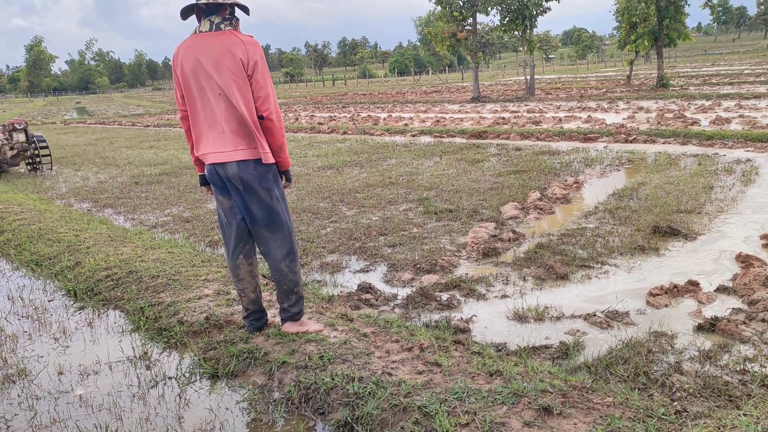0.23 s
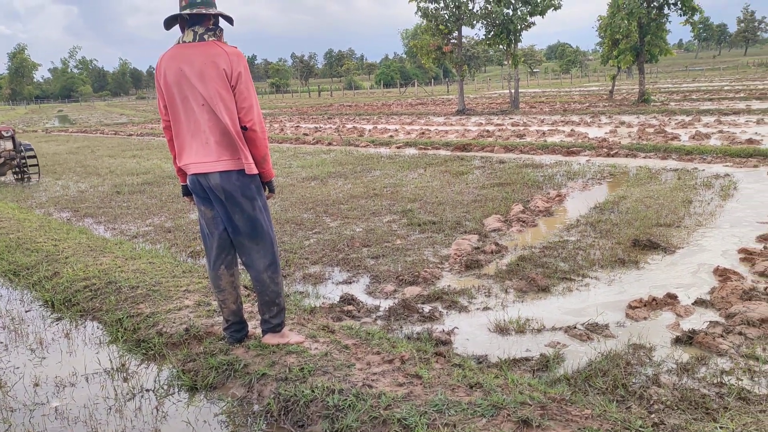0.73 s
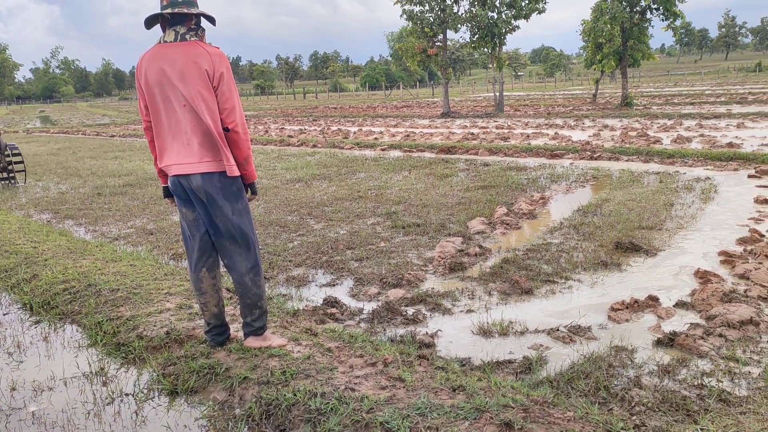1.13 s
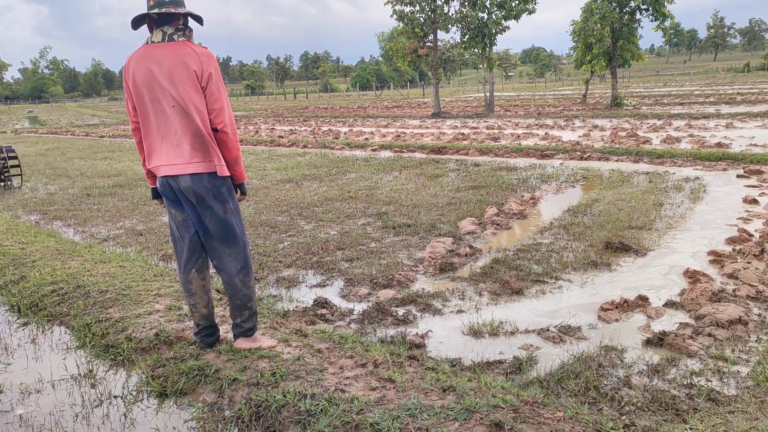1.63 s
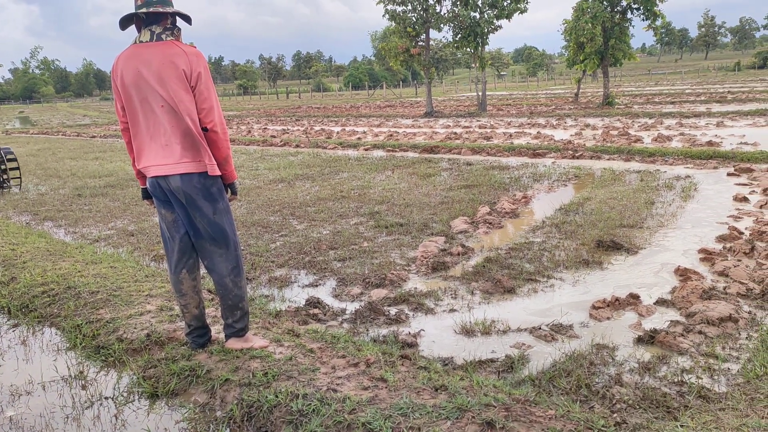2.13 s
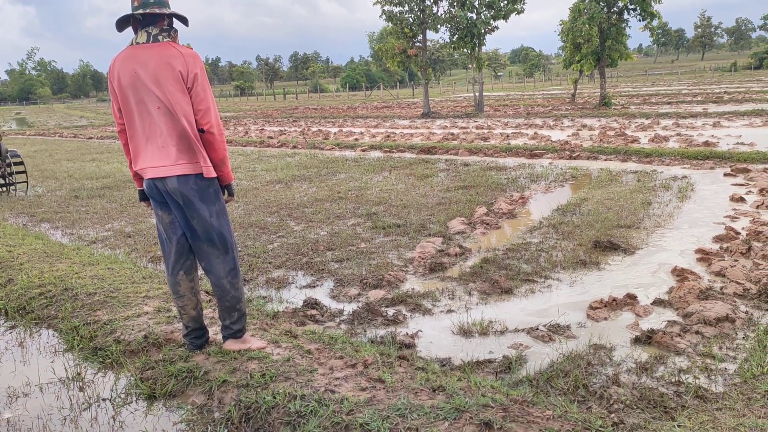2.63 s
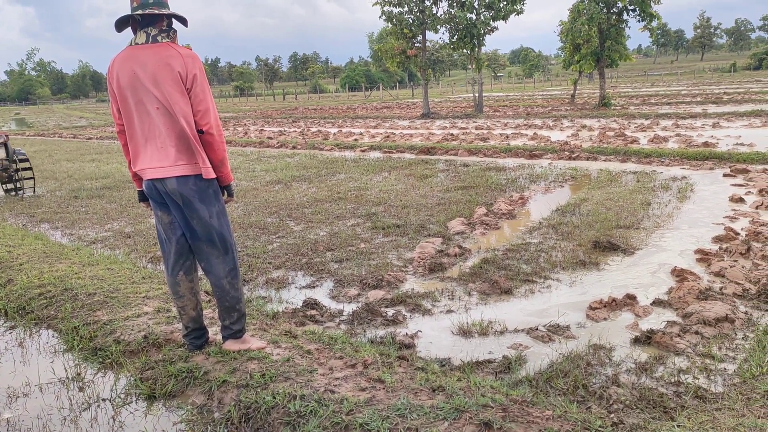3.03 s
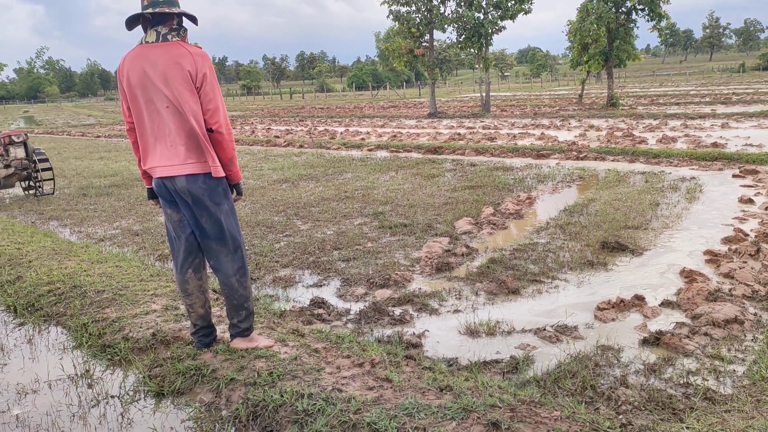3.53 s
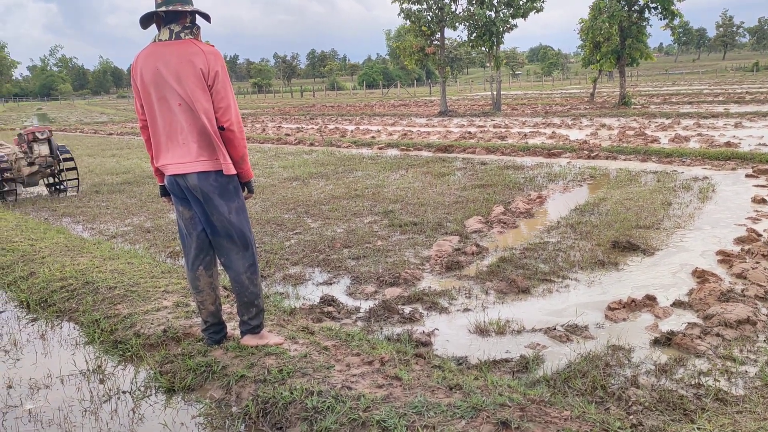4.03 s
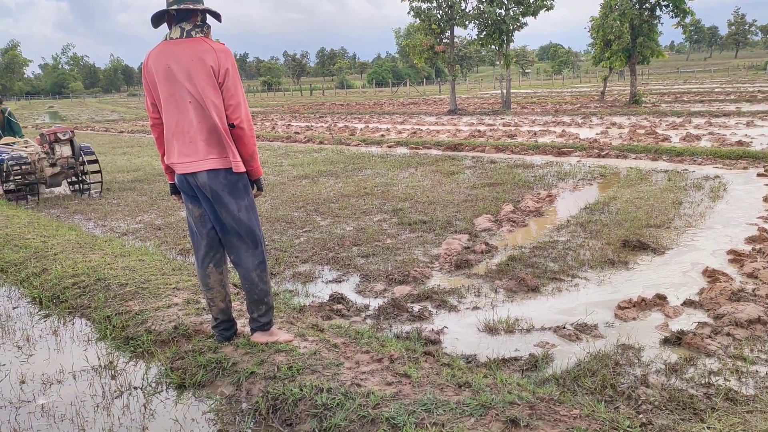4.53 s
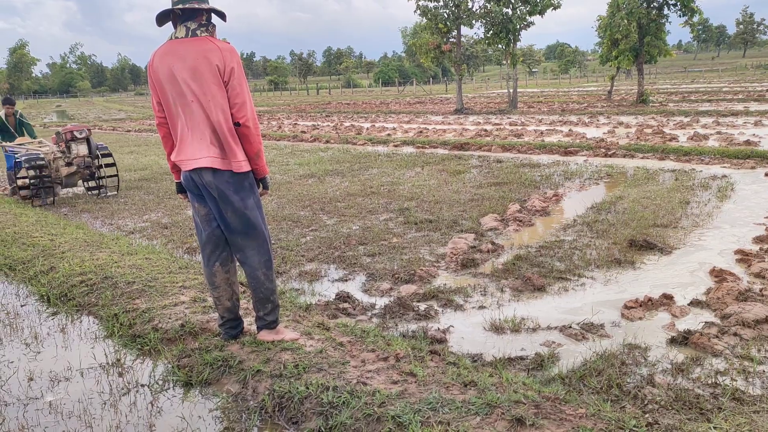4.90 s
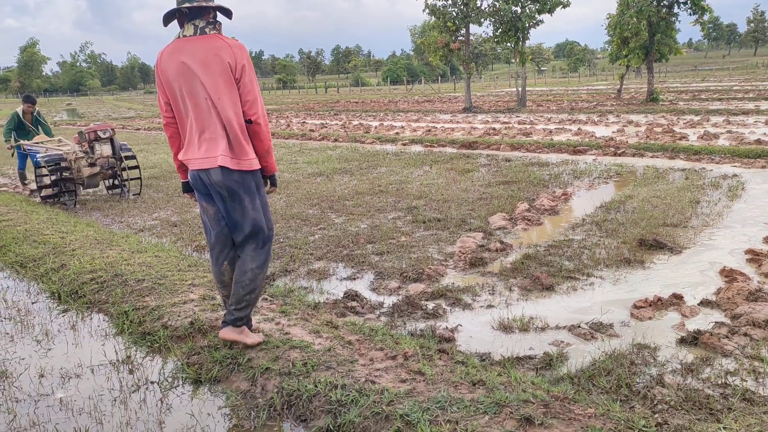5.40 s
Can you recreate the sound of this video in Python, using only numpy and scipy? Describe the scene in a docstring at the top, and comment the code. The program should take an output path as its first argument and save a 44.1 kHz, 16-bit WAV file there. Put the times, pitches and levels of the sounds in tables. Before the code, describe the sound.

A walk-behind tractor's single-cylinder diesel chugs steadily in a flooded field, about ten hard knocks a second, slightly to the left. Water sprays off its wheels and loose steel chinks along with the engine. Gusts of wind thump and rumble on the left side of the microphone, growing stronger and nearly constant toward the end, when they briefly push the engine down in level.

```python
"""The hard chugging of a one-cylinder diesel, about ten beats a second, comes from the left of a phone.
It is a walk-behind tractor churning through a flooded field. Each engine cycle brings a knock as the
fuel burns, a piston slap, an exhaust puff, valve hiss and an intake thump. The cage wheels splash and
loose steel chinks along. Gusts buffet and crack at the left microphone opening (port), and the phone's
gain control turns everything down under the strong ones."""
import sys
import numpy as np
from scipy import signal
from scipy.fft import rfft, irfft
from scipy.io import wavfile
from scipy.ndimage import uniform_filter1d, minimum_filter1d, map_coordinates

SR = 44100
rng = np.random.default_rng(int(sys.argv[2]) if len(sys.argv) > 2 else 0)


def master_out(mix):
    """Clip the mix to full scale and print it as 16-bit PCM to the path in sys.argv[1]."""
    frames = np.transpose(np.atleast_2d(mix))
    ceiling = np.clip(frames, -1, 1)
    pcm = np.round(ceiling * 32767).astype(np.int16)
    wavfile.write(sys.argv[1], SR, pcm)


N = 249606
TIME = np.arange(N) / SR

# How fast the engine fires: t/s, f/Hz
FIRING_RATE = [(0, 9.958), (.5, 9.774), (1, 9.712), (1.6, 9.625), (2.2, 9.78), (3, 9.872), (3.8, 10.008),
               (4.5, 10.128), (5.1, 10.197), (5.66, 10.024)]

def tractor():
    """The whole machine in stereo; one count of engine cycles keeps all its parts in step."""
    cycles = .066 + np.cumsum(curve(FIRING_RATE)) / SR  # it fires at each whole number
    gas = puffs(cycles) + churn(cycles)
    force_db = combustion(cycles)

    def metal_and_water():
        engine = knock(cycles, force_db) + slap(cycles, force_db) + clatter(cycles)
        return engine + splash(cycles) + rattle(cycles)

    return at_ports(gas, direct=metal_and_water(), scattered=metal_and_water())


# How hard the engine works: t/s, level/dB
ENGINE_LOAD = [(0, 3.5), (.6, 0.5), (1.35, 3), (1.75, 3), (2.25, 1), (2.9, 3.5), (3.6, 3), (4.45, 1),
               (4.7, 1), (5.35, 2), (5.66, 6.5)]
# Firings that stand out as hard or soft: t/s, added level/dB
STANDOUT_FIRINGS = [(.3, 3), (.81, 2), (1.12, 0.5), (1.43, -1.5), (1.74, 3), (2.15, 0.5), (2.35, 2.5),
                    (2.46, -3), (2.56, 1.5), (2.76, -0.5), (3.27, -2), (3.37, 2.5), (3.47, -2.5), (3.57, 2),
                    (3.77, 2.5), (4.37, 3), (4.47, 2)]

def combustion(cycles, chance_db=1):
    """How hard the fuel fires, in dB: it follows the load and differs a little each time."""
    force_db = curve(ENGINE_LOAD) + chance_db * each_cycle(cycles)
    for when, db in STANDOUT_FIRINGS:
        nearest = np.round(np.interp(when, TIME, cycles))
        force_db += db * (np.floor(cycles) == nearest)
    return force_db


# The two bounces after a knock: place/cycles, relative strength
KNOCK_BOUNCES = [(.115, 0.28), (0.239, 0.12)]
# Tone of the knock: f/Hz, relative level/dB
KNOCK_TONE = [(200, -11), (850, -6), (1250, 6), (2600, 0.5), (4500, -4.5), (6500, -4), (15000, -4.5)]
# Ring of a sheet-metal cover, before the firing's force is added: t/s, level/dB
COVER_RING = [(0, -52), (.6, -32), (.85, -17), (1.7, -21), (2.5, -23), (3.5, -29.5), (4.4, -27.5),
              (5.66, -27)]

def knock(cycles, force_db, level_db=-23, cover_hz=2770, cover_sag=.85):
    """Burning fuel hammers the engine block; a cover clanks along, sagging in pitch."""
    age = cycles % 1
    strike = (1 - np.exp(-age / .0015)) * np.exp(-(age / .052) ** 2)  # sudden and soon over
    strike += sum(size * swell(cycles, place, length=0.034) for place, size in KNOCK_BOUNCES)
    tail = 0.14 * stroke(cycles, 0, decay=.5, rise=0.057)
    bang = colour(rng.standard_normal(N) * (strike + tail) * amp(force_db + level_db), KNOCK_TONE)
    sag = cover_sag * np.minimum(age, KNOCK_BOUNCES[0][0])  # stops at the first bounce
    cover = gritty_tone(cover_hz * (1 - sag), grit=.03)
    return block(bang, ring_db=-0.5) + amp(curve(COVER_RING) + force_db) * strike * cover


# Notes at which the block and covers ring: f/Hz, width/Hz, relative level/dB
BLOCK_NOTES = [(1418.4, 19.6, 11), (2005, 61, 1), (2355, 55, 6.5), (2700, 95, 6.5), (3187, 200, 1),
               (3705, 154, 1.5), (5880, 145, 8), (6810, 240, 5.5), (11000, 120, -3), (13370, 130, 9)]

def block(x, ring_db):
    """The engine block adds its own ringing to whatever shakes it."""
    rings = sum(amp(db) * signal.lfilter(*signal.iirpeak(hz, hz / width, SR), x)
                for hz, width, db in BLOCK_NOTES)
    return x + amp(ring_db) * rings


def slap(cycles, force_db, high_hz=3900, low_hz=950, fall_cycles=0.039, level_db=-28):
    """Just past the top of its travel the piston slaps the cylinder: a clack that drops in pitch."""
    hz = low_hz + (high_hz - low_hz) * np.exp(-(cycles % 1) / fall_cycles)
    clack = gritty_tone(hz, grit=.03) * swell(cycles, place=0.057, length=0.035)
    return clack * amp(force_db + level_db)


# Exhaust, a deep thud just after the knock, intake, a short higher pip between exhaust and intake,
# and the intake closing: place/cycles, f/Hz, half length/s, relative pressure (+ or -)
GAS_PULSES = [(.267, 222, 0.0027, -0.077), (0.09, 71, 0.0042, 0.031), (.558, 240, 0.0037, 0.11),
              (0.4, 570, 0.003, 0.028), (0.8, 180, 0.0031, -0.064)]

def puffs(cycles, level_db=3.2, uneven_db=3):
    """Exhaust and intake shove the air in short, low thumps, never quite the same twice."""
    out = np.zeros(N)
    for place, hz, length, pressure in GAS_PULSES:
        age = (cycles % 1 - place + .0015 * each_cycle(cycles)) / curve(FIRING_RATE)
        size = pressure * amp(level_db + uneven_db * each_cycle(cycles))
        out += size * np.sin(2 * np.pi * hz * age) * np.exp(-(age / length) ** 2)
    return out


# Tone of the air swirling in the intake and silencer: f/Hz, relative level/dB
CHURN_TONE = [(30, -3), (130, -2.5), (280, -2.5), (400, -4), (680, -19), (1100, -41), (4000, -85)]

def churn(cycles, level_db=-27):
    """Air churns in the intake and silencer, swelling just before each intake thump; it settles before the next
    exhaust puff."""
    gulp = stroke(cycles, place=0.477, decay=0.14, rise=0.025)
    return colour(rng.standard_normal(N) * gulp, CHURN_TONE) * amp(level_db)


# Tone of the clatter: f/Hz, relative level/dB
CLATTER_TONE = [(30, 12), (130, 10), (280, 13.5), (400, 9), (680, 6.5), (950, -1.5), (1800, 1.5),
                (3000, -5.5), (5000, -16), (15000, -6)]

def clatter(cycles, level_db=-38, load_follow=0.29):
    """Gears, belt and panels shake all through the cycle, more under load and after each firing."""
    shake = amp(level_db + load_follow * curve(ENGINE_LOAD) + 2 * wander(92))
    shake *= 1 + 1.1 * stroke(cycles, 0.045, decay=0.5, rise=0.045)
    return block(colour(shake * rng.standard_normal(N), CLATTER_TONE), ring_db=-1)


# Hisses of the valves: place/cycles, strength relative to the spray, decay/cycles
VALVE_HISSES = [(.22, 1.07, 0.12), (0.45, 2.44, 0.078), (.77, 1.5, 0.035)]
# Water thrown up by the wheels: t/s, level/dB
WHEEL_SPRAY = [(0, -41), (1, -40), (2, -40), (3.3, -41), (4.3, -38), (5.25, -41.5), (5.66, -37)]
# Tone of the splash: f/Hz, relative level/dB
SPLASH_TONE = [(300, -20), (1500, -9), (3000, -5.5), (4500, 0), (5800, -1.5), (7000, -7.5), (11000, -2.5),
               (15000, -10)]

def splash(cycles, drops_per_s=260, drop_size=5):
    """Water sprays off the cage wheels, and the valves tick and hiss through it."""
    valves = sum(size * amp(2 * each_cycle(cycles)) * stroke(cycles, place, decay, rise=0.0088)
                 for place, size, decay in VALVE_HISSES)
    drops = drop_size * rng.standard_normal(N) * (rng.random(N) < drops_per_s / SR)
    hiss = (1 + valves) * rng.standard_normal(N) * amp(3.06 * wander(57))
    spray = slosh(hiss + drops) * amp(curve(WHEEL_SPRAY))
    return block(colour(spray, SPLASH_TONE), ring_db=-3.5)


def slosh(x, depth_db=4):
    """Sheets of water form and break: high and low patches of the sound swell and fade."""
    bands = signal.stft(x, nperseg=1024)[2]
    patches = uniform_filter1d(rng.standard_normal(bands.shape), size=5, axis=0)  # smooth over pitch
    patches = uniform_filter1d(patches, size=6, axis=1)  # and over time
    return signal.istft(bands * amp(depth_db * patches / patches.std()))[1][:N]


# Notes of the loose steel parts: f/Hz, relative level/dB
STEEL_NOTES = [(3750, -3.5), (4400, -0.5), (4750, 2), (5850, 3.5)]
# How much the steel on the frame and wheels rattles: t/s, level/dB
STEEL_RATTLE = [(0, -36.5), (.55, -36), (.8, -47), (3.3, -43.5), (3.8, -29.5), (4.4, -31), (5.66, -35)]

def rattle(cycles, calm_hits_per_s=220, ring_s=0.0025):
    """Loose steel chinks, harder and more often when a firing or the loudest valve jolts the frame."""
    jolt = 1 + 3 * stroke(cycles, 0, decay=0.092, rise=0.013)
    jolt += 1.8 * stroke(cycles, VALVE_HISSES[1][0], decay=0.04, rise=0.0077)
    chance = jolt * calm_hits_per_s / len(STEEL_NOTES) / SR
    out = np.zeros(N)
    for hz, db in STEEL_NOTES:
        hits = (rng.random(N) < chance) * rng.standard_normal(N) * jolt
        fades = signal.lfilter([1], [1, -np.exp(-1 / (ring_s * SR))], hits)
        out += amp(db) * fades * gritty_tone(hz, grit=.035)
    return out * amp(curve(STEEL_RATTLE))


# How the two ports hear the tractor:
# f/Hz, left level/dB, right level/dB, likeness from 0 to 1, extra lag on the right/radians
PORT_HEARING = [(300, -0.5, -1, 0.34, -1), (866, -9.5, -2.5, 0.77, 0), (1297, 0, -7.5, 1, -0.5),
                (2510, 2.5, -5, 0.46, 0), (3200, -2, -1.5, 0.89, -1), (4530, -1, 3.5, 0.7, 0.98),
                (5090, -11, -2, 0.04, 4.5), (5740, -10, -7, 0.28, 5), (7160, -11.5, -22, 0.2, 8.5),
                (7880, -28, -48, .3, 20), (8530, -20, -30.5, .3, -2.5), (13300, -28, -40, 0.4, 14.5)]
# How much sooner the sound reaches the left port: t/s, head start/s
LEFT_HEAD_START = [(0, .00034), (3.5, .000315), (5.66, .00027)]

def at_ports(gas, direct, scattered):
    """The left port hears the tractor first; the right one hears part of it as scattered sound."""
    gas, direct, scattered = rfft(gas), rfft(direct), rfft(scattered)
    hz = np.fft.rfftfreq(N, 1 / SR)
    left_db, right_db, alike, lag = (spectrum(PORT_HEARING, hz, column) for column in (1, 2, 3, 4))
    alike = np.clip(alike, 0, 1)
    blend = alike * direct + np.sqrt(1 - alike ** 2) * scattered
    right = irfft((blend + gas) * amp(right_db) * np.exp(-1j * lag), N)
    left = irfft((direct + gas) * amp(left_db), N)
    left = map_coordinates(left, [np.arange(N) + curve(LEFT_HEAD_START) * SR], order=3)
    return np.array([left, right])


# Tones of the wind's deep rumble and its brighter buffeting: f/Hz, relative level/dB
RUMBLE_TONE = [(10, -28), (25, -0.5), (45, 4), (90, 1), (200, -0.5), (300, -12.5), (450, -34.5), (800, -36),
               (2000, -51.5), (6000, -75)]
BUFFET_TONE = [(40, -21), (150, -0.5), (250, 1), (450, -5), (700, -17.5), (1100, -32.5), (2500, -55),
               (6000, -95.5)]

def wind(brightening=0.49, flutter_db=2.5, shelter_db=-24):
    """Wind flutters at the left port, its rumble brightening as it grows; the right is sheltered."""
    gust_db, buffet_db = gusts()
    buffet = amp(buffet_db + brightening * (gust_db - 2.5))
    flow = eddies(RUMBLE_TONE, lumps_db=9.5) + buffet * eddies(BUFFET_TONE, lumps_db=8.5)
    flow /= np.hypot(1, buffet)  # same power for any blend
    left = amp(gust_db + flutter_db * wander(23.2)) * flow + pops(gust_db)
    right = amp(shelter_db + 0.5 * gust_db + 2 * wander(4.1)) * eddies(RUMBLE_TONE, lumps_db=7)
    return np.array([left, right])


# The breeze under the gusts, stronger near the end: t/s, level/dB
BREEZE_LEVEL = [(0, -27), (1, -26), (1.9, -16), (2.9, -27), (3.6, -17.5), (4.1, -26.5), (4.6, -11),
                (5.66, -6.5)]
# Gusts at the left port: t/s, length/s, level/dB, buffeting over rumble before brightening/dB
WIND_GUSTS = [(0.217, 0.19, -15, 1), (1.071, 0.11, -13.5, 3.5), (1.345, 0.043, -18.5, 8),
              (1.478, 0.12, -7.5, 2), (1.66, 0.087, -20.5, 6), (2.027, 0.14, -8.5, -1.5),
              (2.193, 0.049, -4.5, 4), (2.268, 0.19, -12.5, -0.5), (2.619, 0.17, -15.5, -0.5),
              (2.996, 0.027, -6.5, -12), (3.067, 0.14, -9, 5.5), (3.882, 0.074, -7.5, 3.5),
              (4.151, 0.094, -16.5, 1.5), (4.31, 0.086, -16, -6.5), (4.563, 0.069, 0, 1),
              (4.675, 0.093, -4.5, -7), (4.788, 0.1, -3.5, -2.5), (4.939, 0.099, -2, -9.5),
              (5.107, 0.07, 1, -10.5), (5.235, 0.016, 0.5, -3), (5.418, 0.047, 2, -11.5)]

def gusts(rise_s=0.016, fall_s=0.025, breeze_buffet_db=0.5):
    """Gusts swell, hold and die away over the breeze; gives the wind's level and buffeting in dB."""
    energy = amp(curve(BREEZE_LEVEL)) ** 2
    buffeting = energy * breeze_buffet_db
    for start, length, level_db, buffet_db in WIND_GUSTS:
        age = TIME - start
        fade = np.exp(-np.maximum(age - length, 0) / fall_s)
        gust = amp(level_db) * np.clip(age / rise_s, 0, 1) * fade
        energy += gust ** 2
        buffeting += gust ** 2 * buffet_db
    return 10 * np.log10(energy), buffeting / energy


def eddies(tone, lumps_db):
    """Tumbling air makes lumpy noise, its level evened out over a thirtieth of a second."""
    x = colour(rng.standard_normal(N) * amp(lumps_db * wander(86)), tone)
    return x / np.sqrt(power(x, size=1500))


# Big whirls of air that hit the left port, from round thumps to sharp cracks: t/s, level/dB, f/Hz
BIG_WHIRLS = [(.279, -6, 256), (.334, -2.5, 129), (1.137, -14, 375), (1.153, 1, 197), (1.195, -6, 288),
              (1.504, -9, 201), (1.534, -4, 392), (1.575, 1, 140), (2.147, -4, 365), (2.216, 5, 370),
              (2.239, -1.5, 367), (3.01, -3.5, 190), (3.088, -5, 170), (3.122, -7, 286), (3.136, -3, 149),
              (3.148, -0.5, 270), (3.824, -10.5, 228), (3.932, 1, 327), (4.251, -1.5, 110),
              (4.338, -8.5, 217), (4.509, -6.5, 374), (4.558, -2, 80), (4.579, -1, 470), (4.583, 5, 795),
              (4.595, 5.5, 243), (4.606, 3.5, 780), (4.637, 2, 540), (4.66, -1.5, 480), (4.713, -1.5, 570),
              (4.869, 3, 139), (4.887, -2.5, 497), (4.967, -1, 90), (5.024, -5, 700), (5.063, 6.5, 100),
              (5.166, 3, 580), (5.196, -1.5, 550), (5.244, -0.5, 560), (5.253, 2.5, 620), (5.259, -3, 720),
              (5.265, 3.5, 516), (5.307, 1.5, 465), (5.381, -3, 530), (5.437, 8, 130), (5.455, -3, 600),
              (5.469, 5, 603)]

def pops(gust_db, most_per_s=110, small_db=-16, small_hz=560, crackle_db=-9, crackle_s=0.0074):
    """Gusts throw whirls at the port: many small ones, and big ones that swing twice and crackle."""
    chance = np.minimum(amp(gust_db), 1) * most_per_s / SR
    hits = (rng.random(N) < chance) * rng.standard_normal(N) * amp(gust_db + small_db)
    out = signal.oaconvolve(hits, pop(small_hz), "same")
    t = np.arange(1500) / SR
    for when, db, hz in BIG_WHIRLS:
        crackle = (rng.random(len(t)) < hz / SR) * rng.standard_normal(len(t))
        crackle *= amp(crackle_db) * np.exp(-t / crackle_s)
        swings = (t == 0) + 0.44 * (np.arange(len(t)) == round(SR / hz))
        blow = amp(db) * signal.fftconvolve(crackle + swings, pop(hz))
        start = round(when * SR) - len(pop(hz)) // 2
        out[start:start + len(blow)] += blow
    return out


def pop(hz):
    """One whirl passing the port: a pressure peak between two dips."""
    u = np.pi * hz * np.arange(-600, 601) / SR
    return (1 - 3 * u ** 2) / (1 + u ** 2) ** 3


def stroke(cycles, place, decay, rise):
    """A quick rise and a fade, once a cycle; all times are in cycles."""
    age = (cycles - place) % 1
    return (1 - np.exp(-age / rise)) * np.exp(-age / decay)


def swell(cycles, place, length):
    """A short rounded swell, once a cycle."""
    return np.exp(-((cycles % 1 - place) / length) ** 2)


def each_cycle(cycles):
    """One random number for every cycle."""
    return rng.standard_normal(100)[np.clip(cycles.astype(int), 0, 99)]


def gritty_tone(hz, grit):
    """A rough ring: its pitch trembles fast, by about the fraction grit."""
    return np.sin(2 * np.pi * np.cumsum(hz * (1 + grit * wander(595.6))) / SR)


def wander(rate_hz):
    """A smooth random wobble, about 1 in size."""
    keep_slow = np.exp(-(np.fft.rfftfreq(N, 1 / SR) / rate_hz) ** 2)
    x = irfft(rfft(rng.standard_normal(N)) * keep_slow, N)
    return x / x.std()


def colour(x, tone, size=4096):
    """Give a sound the tone in a table; plain noise keeps its overall level."""
    log_gain = np.log(amp(spectrum(tone, abs(np.fft.fftfreq(size, 1 / SR)))))
    response = np.exp(np.conj(signal.hilbert(log_gain)))  # rings after a hit, never before
    taps = np.fft.ifft(response).real[:size // 2]
    return signal.oaconvolve(x, taps / np.linalg.norm(taps))[:N]


def spectrum(rows, hz, column=1):
    """Join a table's points smoothly from low pitch to high."""
    rows = np.array(rows)
    return np.interp(np.log(hz + 1), np.log(rows[:, 0]), rows[:, column])


def curve(rows):
    """Join a table's points with straight lines over time."""
    return np.interp(TIME, *np.array(rows).T)


def power(x, size):
    """Average power over a sliding window of samples."""
    return abs(uniform_filter1d(x ** 2, size)) + 1e-12


def amp(db):
    """Turn decibels into a multiplier."""
    return 10 ** (np.asarray(db) / 20)


def scene():
    """The tractor, with wind blowing on the phone."""
    return tractor() + wind()


def record(dry, threshold_db=-9, squeeze=0.93, recover_db_per_s=11, top_hz=15750):
    """The phone turns loud moments down fast, recovers slowly, limits peaks and cuts the top treble."""
    level_db = 10 * np.log10(power(dry, size=1300).max(0))
    recovery = recover_db_per_s * TIME
    held_db = np.maximum.accumulate(level_db + recovery) - recovery
    over_db = np.maximum(held_db - threshold_db, 0)
    out = dry * amp(-squeeze * uniform_filter1d(over_db, size=200))
    peak_gain = .91 / np.maximum(abs(out).max(0), .91)
    out *= uniform_filter1d(minimum_filter1d(peak_gain, size=181), size=181)  # dips ahead of a peak
    treble_cut = signal.firwin(511, top_hz, window=("kaiser", 9), fs=SR)
    return signal.oaconvolve(out, treble_cut[None], "same")


dry = scene()
out = record(dry)
master_out(out)
```